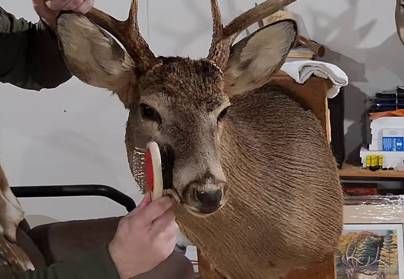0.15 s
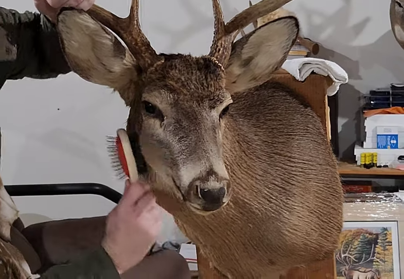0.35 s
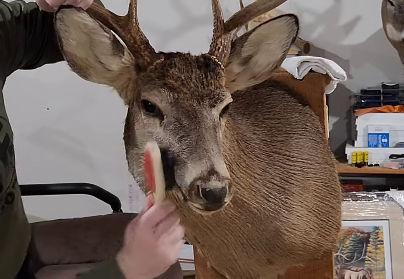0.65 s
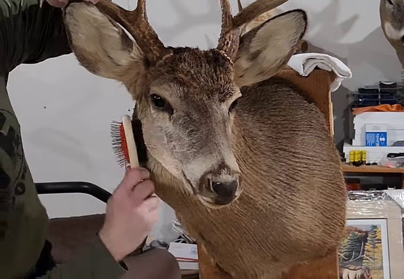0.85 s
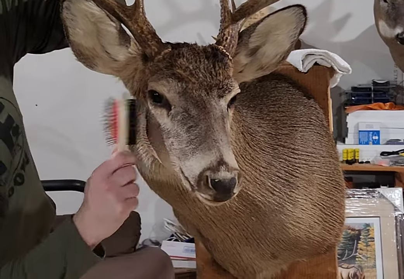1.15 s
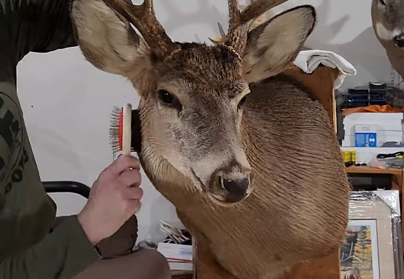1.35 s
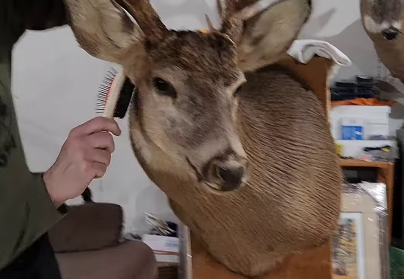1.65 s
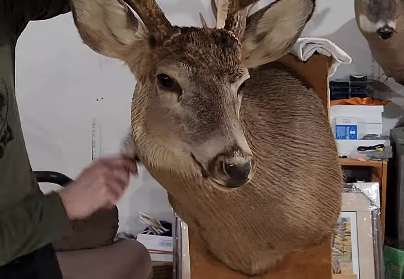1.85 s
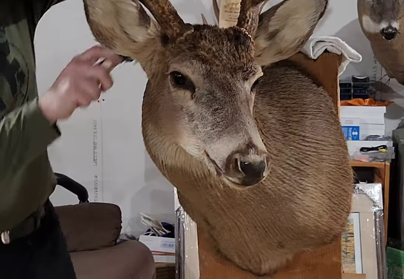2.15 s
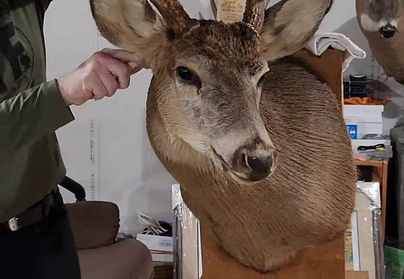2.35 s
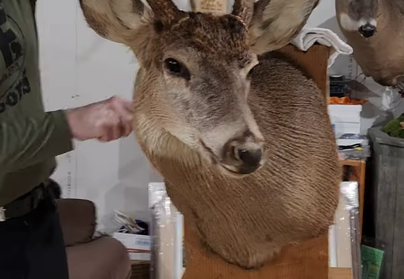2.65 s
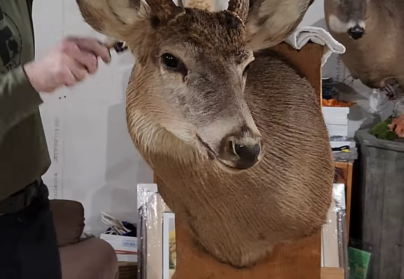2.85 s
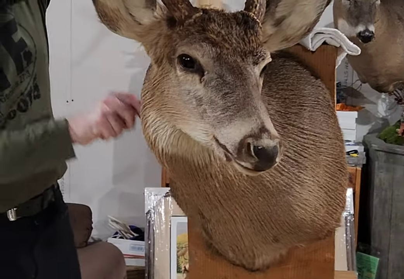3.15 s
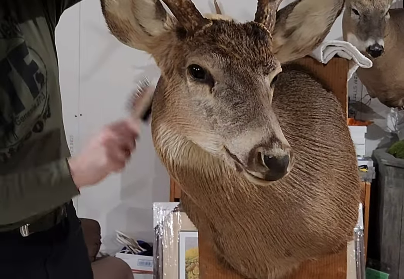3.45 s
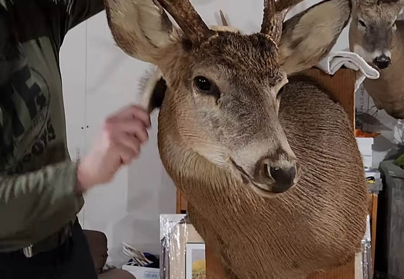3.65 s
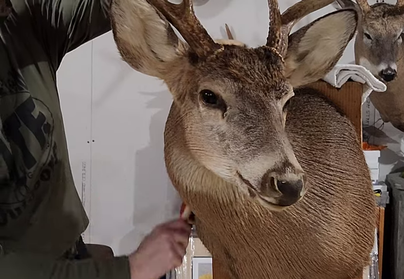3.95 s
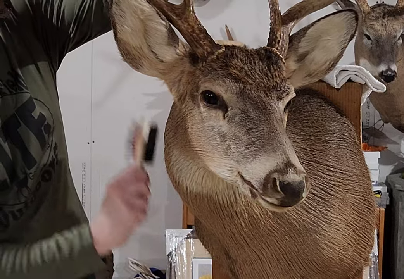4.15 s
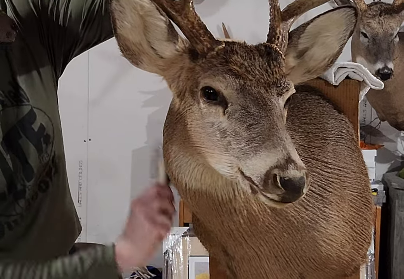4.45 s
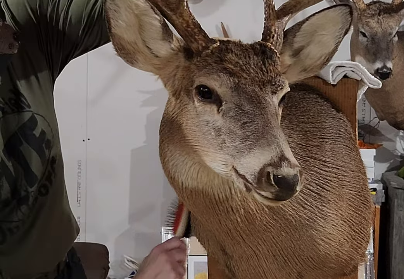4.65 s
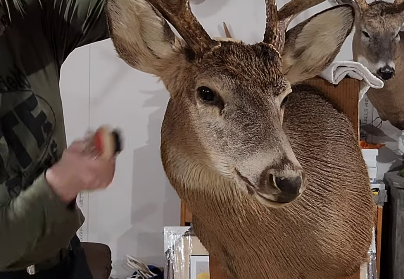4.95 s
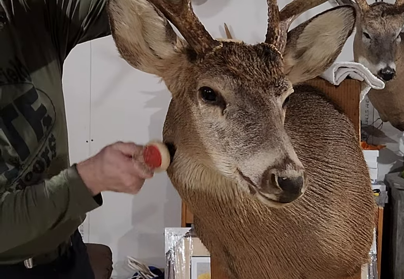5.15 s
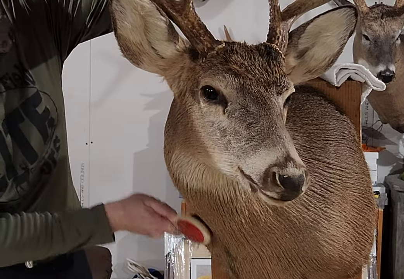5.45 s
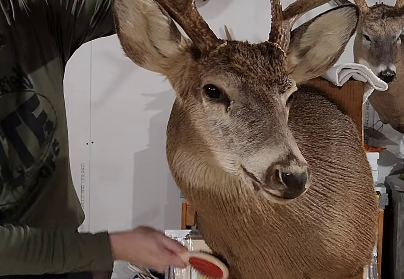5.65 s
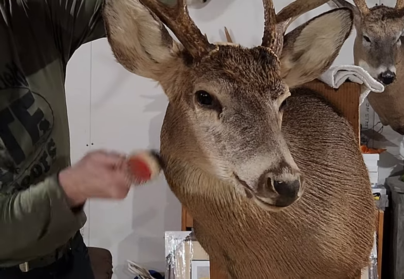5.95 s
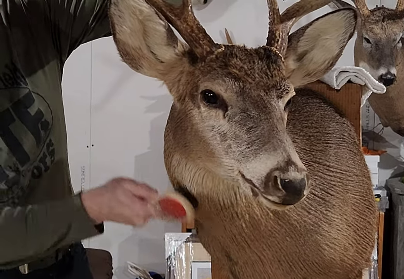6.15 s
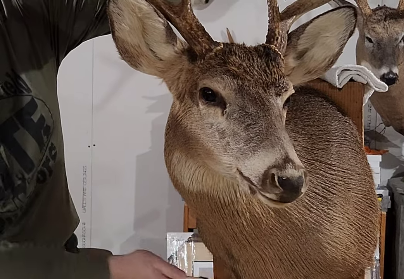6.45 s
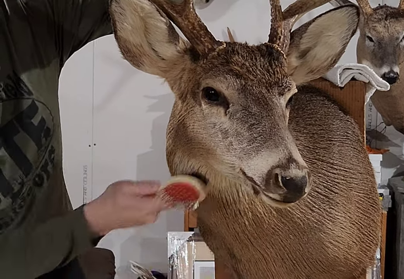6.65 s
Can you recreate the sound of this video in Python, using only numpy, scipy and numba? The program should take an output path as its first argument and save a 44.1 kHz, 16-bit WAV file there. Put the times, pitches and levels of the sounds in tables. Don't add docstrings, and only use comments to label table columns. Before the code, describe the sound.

A stiff brush works through coarse hair on a hollow mounted deer head, close to a phone in a small workshop. The tail of one stroke opens, then a short bright scratch at 0.2 s. At 0.7 s the brush lands with a crisp tap and a longer rasp; a dull thump at 1.2 s leads into a firm stroke, and a brief one follows at 1.8 s. From 2.2 s strokes sound hollower, a long one peaking near 2.6 s. Another from 3.0 s ends in a loud, sharp wooden clack at 3.3 s with a short ring. After a pause, sweeps come at 3.7 and 4.4 s, a long one landing with a dull thump at 5.1 s, a short one at 5.6 s, a hissier long one at 6.05 s, and a last brief touch near 6.8 s. A faint, rapidly beating low motor hum and soft airy rumble continue throughout.

```python
import sys
import numpy as np
from scipy import signal
from scipy.fft import rfft, irfft, next_fast_len
from scipy.io import wavfile
from scipy.ndimage import uniform_filter1d
from numba import njit

SR = 44100
rng = np.random.default_rng(int(sys.argv[2]) if len(sys.argv) > 2 else 0)


def to_linear_factor(level_db):
    exponent = np.asarray(level_db, float) / 20
    return 10 ** exponent


def waveform_to_disk(signal):
    frames = np.transpose(np.atleast_2d(signal))
    scaled = np.clip(frames, -1, 1) * 32767
    samples = np.round(scaled).astype(np.int16)
    wavfile.write(sys.argv[1], SR, samples)


N = 299439
T = np.arange(N) / SR
SIZE = next_fast_len(N)
HZ = np.maximum(np.arange(SIZE // 2 + 1) * SR / SIZE, 1)


def level(x, db):
    return x * to_linear_factor(db) / np.sqrt(np.mean(x ** 2))


def along(points, hz=HZ):
    f, v = np.transpose(points)[:2]
    return np.interp(np.log(hz), np.log(f), v)


def shape(x, gain):
    return irfft(rfft(x, SIZE) * gain, SIZE)[..., :x.shape[-1]]


def above(hz, order=4):
    return 1 / (1 + np.minimum(hz / HZ, 10 ** (100 / order)) ** (2 * order))


def band_noise(order, low_hz, high_hz, count):
    return signal.lfilter(*signal.butter(order, [low_hz, high_hz], "band", fs=SR), rng.standard_normal(count))


def walk(rate):
    hold = int(SR / rate)
    steps = np.repeat(rng.standard_normal(N // hold + 1), hold)
    return 1.68 * uniform_filter1d(uniform_filter1d(steps, hold), hold)[:N]


def ring(modes, rise_s, flip=-1):
    t = T[:SR]
    free = 0
    for k, (hz, db, t60) in enumerate(modes):
        free = free + flip ** k * to_linear_factor(db - 60 * t / t60) * np.sin(2 * np.pi * hz * t)
    return free * (1 - np.exp(-(t / rise_s) ** 2))


def add(out, s, x):
    i = int(s * SR)
    out[i:i + len(x)] += x[:len(out) - i]


@njit
def svf(x, hz, k):
    y, band, low = np.empty(len(x)), 0., 0.
    for i in range(len(x)):
        g = np.tan(np.pi * hz[i] / SR)
        v = (band + g * (x[i] - low)) / (1 + g * (g + k))
        band, low, y[i] = 2 * v - band, low + 2 * g * v, k * v
    return y


# frequency in Hz, level in dB per Hz.
BRISTLE_COLOUR = [(180, -39), (300, -3), (440, -22), (814, -2), (1060, -5), (1390, -5.5), (2170, -2),
                  (2570, -6), (4590, -10), (5800, -19), (7690, -18), (10600, -24.5), (11700, -19.5),
                  (14700, -19.5), (16000, -28)]


def brush():
    db, neck_db, form_db, hiss_db, form_hz = hand()
    db = db - 40 * np.interp(T, [3.32, 3.38, 3.6, 3.64], [0, 1, 1, 0])
    colour = to_linear_factor(along(BRISTLE_COLOUR))
    clicks = flicks(14000, 1.5) * to_linear_factor(1.3 * walk(70) + 1.3 * walk(25))
    drag = flicks(9000, 1.2) * to_linear_factor(1.5 * walk(35))
    scratch = shape(clicks, colour * np.sqrt(above(2880) * (1 - above(6200))))
    tuft_hz = np.clip(3700 * (1 + 0.38 * walk(8.2)), 2000, 7000)
    scratch = scratch + 0.58 * svf(scratch, tuft_hz, 0.071)
    hiss = shape(clicks, colour * np.sqrt(above(6200)))
    neck = shape(drag, colour * np.sqrt(above(380) * (1 - above(610))))
    form = shape(drag, colour * np.sqrt(above(900) * (1 - above(2500))))
    cavity_hz = np.clip(form_hz * (1 + 0.041 * walk(27)), 300, 4000)
    form = form + 1.1 * svf(form, cavity_hz, 0.35)
    body = to_linear_factor(neck_db) * level(neck, 0) + to_linear_factor(form_db) * level(form, 0)
    return to_linear_factor(db) * (level(scratch, 0) + body + to_linear_factor(hiss_db) * level(hiss, 0))


def flicks(rate, spread_db):
    moment, size = rng.random((N, 2)).T
    return (moment < rate / SR) * to_linear_factor(-spread_db * np.log(1 - size)) * rng.standard_normal(N)


# start in seconds, length in seconds, hardest point as share of the length,
# scratch level there in dB, fine hiss in dB above the scratch.
CHEEK_STROKES = [
    (0.236, 0.21, 0.47, -50, 1),
    (0.689, 0.31, 0.56, -48, -1),
    (1.274, 0.18, 0.74, -46, -3.5),
    (1.767, 0.098, 0.43, -49, -1),
    (6.757, 0.036, .2, -50.5, -3.5),
]
# start in seconds, length in seconds, hardest point as
# share of the length, scratch level there in dB, fine hiss in dB above the scratch.
NECK_STROKES = [
    (-.1, 0.14, 0.59, -53.5, -5),
    (.09, .12, 0.24, -60.5, -5.5),
    (2.0, .18, .9, -66.5, -3),
    (2.18, .18, .5, -57.5, -7.5),
    (2.359, .34, 0.73, -52, -4.5),
    (3.022, 0.24, 0.94, -51.5, -5),
    (3.72, 0.27, 0.22, -53.5, -3),
    (4.375, 0.28, 0.25, -53, -2.5),
    (4.72, .08, .3, -75.5, 2),
]
# start in seconds, length in seconds, hardest point as share of the
# length, scratch level there in dB, fine hiss in dB above the scratch.
CHEST_STROKES = [
    (3.301, .016, .9, -44.5, -12),
    (5.105, .42, 0.19, -52.5, -4.5),
    (5.573, .115, 0.48, -53.5, -2),
    (6.045, .37, .25, -52.5, -0.5),
]
# form at landing and at lift-off in dB, neck at landing
# and at lift-off in dB, ring at landing and at lift-off in Hz; levels relative to the scratch.
PLACE_RING = [(-0.5, -4, -15.5, -13.5, 1700, 1350), (-1, 4, -15, -6.5, 1650, 1330),
              (-2, 3, -12, -5.5, 1450, 1200)]
PLACE_PRESSURE = [(35, 21), (45, 22), (90, 12)]
# form in dB, neck in dB, hiss in dB, ring in Hz.
HOVER_TONE = (-2, 4, -4, 1302)
# start in seconds, end in seconds, level in dB.
MOUNT_ROCKS = [
    (0.127, 0.18, -61),
    (0.853, 0.89, -58.5),
    (1.323, 1.375, -55),
    (5.72, 5.875, -61),
]
# start in seconds, end in seconds, level in dB.
BRISTLE_DIGS = [
    (.89, 0.917, -48),
    (2.192, 2.27, -51),
    (2.6, 2.673, -57),
    (5.4, 5.505, -48),
    (6.36, 6.364, -45.5),
]


def hand():
    step = 64
    t = T[::step]
    form_db, neck_db, hiss_db, ring_hz = HOVER_TONE
    hover_db = -72.5 - 2 * t
    best = np.array([hover_db] + [np.full(len(t), 1. * v) for v in (neck_db, form_db, hiss_db, ring_hz)])
    places = zip((CHEEK_STROKES, NECK_STROKES, CHEST_STROKES), PLACE_RING, PLACE_PRESSURE)
    soft_db_s, tap_db_s, lift_db_s = 329, 3000, 397
    for strokes, (form0, form1, neck0, neck1, hz0, hz1), (press, ease) in places:
        for s, length, hardest, db, hiss_db in strokes:
            u = np.clip((t - s) / length, 0, 1)
            after = np.maximum(t - s - length, 0)
            lean = length * (press * np.maximum(hardest - u, 0) + ease * np.maximum(u - hardest, 0))
            tapped = min(abs(s - tap[0]) for tap in LANDINGS) < .01
            landing = (tap_db_s if tapped else soft_db_s) * np.maximum(s - t, 0)
            lifting = np.minimum(lift_db_s * after, 22.5 + 40 * after)
            arch = 1.5 * (2 * (u - .5)) ** 2
            stroke = [db - lean - (landing + lifting), neck0 + (neck1 - neck0) * u,
                      form0 + (form1 - form0) * u ** 0.95, hiss_db - arch, hz0 + (hz1 - hz0) * u]
            best = np.where(stroke[0] > best[0], stroke, best)
    for layer, rows, db_s in ((1, MOUNT_ROCKS, soft_db_s), (2, BRISTLE_DIGS, 158)):
        for start, end, db in rows:
            outside = np.maximum(np.maximum(start - t, t - end), 0)
            best[layer] = np.maximum(best[layer], db - best[0] - db_s * outside)
    slack = max(int(.012 * SR / step), 1)
    return [np.interp(T, t, c) for c in uniform_filter1d(best, slack)]


# time in seconds, tick in dB, tick pitch in Hz, thump in dB, thump delay in
# seconds.
LANDINGS = [
    (.692, -23, 3000, -39, 0.02),
    (1.2125, -39.5, 2660, -32.5, 0.00026),
    (2.18, -43, 2640, -50, 0.0013),
    (5.106, -45, 1660, -34.5, 0.00082),
    (6.046, -50, 1510, -44.5, 0.0043),
]
# frequency in Hz, level in dB, 60 dB decay in seconds.
FORM_THUMP = [(167.7, -1.5, 0.25), (190, 7, 0.082), (245, 10.5, 0.12), (290, -24, 0.085), (400, -5, 0.032)]


def taps():
    out = np.zeros(N)
    for s, tick_db, hz, thump_db, late in LANDINGS:
        tick = [(hz, 0, .012), (.7 * hz, -6, .016), (1.22 * hz, -7, .008), (2.25 * hz, -15, .01)]
        add(out, s, to_linear_factor(tick_db) * ring(tick, .0004))
        add(out, s, to_linear_factor(tick_db + 0.5) * snap(hz))
        add(out, s + late, to_linear_factor(thump_db - 5.5) * ring(FORM_THUMP, 0.0018, flip=0.79))
        pat = band_noise(1, 500, 1700, 4000)
        add(out, s, to_linear_factor(thump_db - 3 - 60 * T[:4000] / 0.057) * pat)
    return shape(out, above(85, order=2))


def snap(hz):
    return band_noise(1, hz / 3, 1.5 * hz, 600) * to_linear_factor(-60 * T[:600] / .012)


# frequency in Hz, level in dB, 60 dB decay in seconds.
WOOD_MODES = [(427, -23, 0.021), (683, -22.5, 0.025), (900, -3.5, 0.015), (1312, -3, 0.016),
              (1600, -17, 0.042), (1882, -14.5, 0.036), (2196, -14, 0.0084), (2775, -18, 0.015),
              (4700, -39, .008)]
# frequency in Hz, level in dB per Hz.
CRACK_COLOUR = [(150, -40.5), (300, -27), (500, -10.5), (800, 5.5), (1400, -6), (2000, -20), (3000, -12.5),
                (5000, -27.5), (8000, -39), (12000, -38.5)]
CLACK_S, CLACK_DB = 3.3166, 3


def clack():
    out, blow = np.zeros(N), np.zeros(N)
    blow[int((CLACK_S + .0009) * SR)] = 1
    add(out, CLACK_S, to_linear_factor(CLACK_DB) * ring(WOOD_MODES, 0.00056))
    mount = [(168, -38.5, 0.16), (195, -43, 0.19), (272, -35, 0.16), (349, -34.0, .12)]
    add(out, CLACK_S, ring(mount, 0.018))
    t = T[:SR // 4]
    shiver = band_noise(2, 2300, 6200, SR // 4)
    swell = np.clip(t / 0.0046, 0, 1) * to_linear_factor(-60 * t / 0.054)
    add(out, CLACK_S + 0.0083, to_linear_factor(-21.5) * shiver * swell)
    return out + to_linear_factor(CLACK_DB + 19.5) * shape(blow, to_linear_factor(along(CRACK_COLOUR)))


def singing():
    out = np.zeros(N)
    add(out, CLACK_S, ring([(657, -49, 1.6), (888, -41, .36)], .015))
    return out


# frequency in Hz, left minus right in dB.
PORT_TILT = [(60, -2.5), (110, -1.5), (200, -0.5), (380, 0.5), (700, -0.5), (1290, -2.0), (2380, -1.0),
             (4400, -2.5), (8120, 3.5), (15000, 2.5)]
# frequency in Hz, lead of the left port in radians for a source on the left.
PORT_LEAD = [(0, 0), (1460, 0.7), (2240, -0.0), (4820, 2.2), (6980, 2.7), (8270, 2.1), (8530, 3.1),
             (10800, 3.1), (11400, 4.4), (12700, 3.9), (14000, 5.1), (14600, 4.5), (15200, 5.5),
             (16200, 3.2)]


def ports(x, off_axis):
    lead = off_axis * np.interp(HZ, *np.transpose(PORT_LEAD))
    tilt = to_linear_factor(along(PORT_TILT) / 2) * np.exp(.5j * lead)
    return shape(x, np.array([tilt, 1 / tilt]))


# delay in seconds, left level in dB, right level in dB.
WALL_ECHOES = [
    (.0052, -1, 0),
    (.012, -8, -9),
    (.016, -7, -7),
    (.0225, -6, -7),
]
# band centre in Hz, 60 dB decay in seconds, level in dB.
ROOM_TAIL = [(127.1, 0.17, -16.5), (223, 0.4, -14), (490, 0.29, 10), (990, 0.17, 3), (2000, 0.38, -7),
             (3820, 0.27, 2), (7940, 0.028, -2.5), (13800, 0.14, 5.5)]


def room():
    t = T[:SR // 2]
    noise, tail, low = rng.standard_normal((2, len(t))), 0, 1
    alike = np.clip(.9 - .7 * above(600, order=1), 0, .98)
    noise[1] = shape(noise[0], alike) + shape(noise[1], np.sqrt(1 - alike ** 2))
    for hz, t60, db in ROOM_TAIL:
        high = above(hz * np.sqrt(2), order=2)
        tail = tail + shape(noise, low - high) * to_linear_factor(db - 60 * t / t60)
        low = high
    tail = tail * np.clip((t - .004) / 0.0073, 0, 1)
    tail = to_linear_factor(0.5) * tail / np.sqrt(np.sum(tail ** 2) / 2)
    echoes = np.zeros_like(tail)
    for s, left_db, right_db in WALL_ECHOES:
        echoes[:, int(s * SR)] = to_linear_factor(np.array([left_db, right_db]))
    return tail + shape(echoes, 1 - above(3200, order=1))


# time in seconds, level in dB.
MOTOR_TURN = [(0, -1), (1, -1.5), (3, -4), (4.2, -4.5), (5.7, -5), (6.2, -2.5), (6.79, -4.5)]
# level in dB, share of the turn 0-1.
MOTOR_LINES = [(-51, 1), (-58, .1), (-66.5, .8)]


def hum():
    turn_db = np.interp(T, *np.transpose(MOTOR_TURN))
    low_db, high_db, third_db = (db + share * turn_db for db, share in MOTOR_LINES)
    side = np.array([[1], [-1]])
    phase = 2 * np.pi * np.cumsum(1 + .0008 * walk(1.2)) / SR
    beat = 2 * np.pi * 13.21 * (T - .036)
    low = to_linear_factor(low_db - .7 * side + .4 * walk(11)) * np.sin(230.95 * phase + 0.21 * side)
    high = to_linear_factor(high_db + 1.1 * side + .6 * walk(2.1)) * np.sin(230.95 * phase + beat + 0.54 * side)
    third = to_linear_factor(third_db + 1.2 * walk(1.6)) * np.sin(356.4 * phase + .6 * side)
    return np.sqrt(2) * (low + high + third)


# frequency in Hz, level in dB per Hz.
AIR_COLOUR = [(20, -15), (67, -0.7), (130, -8.5), (300, -13), (700, -17.5), (1100, -22), (2100, -22.5),
              (2800, -33), (5000, -36), (8000, -49.5), (10500, -55), (13500, -50), (15500, -47)]
# frequency in Hz, left-right likeness 0-1.
AIR_LIKENESS = [(60, .85), (250, 0.7), (640, 0), (15000, 0)]


def air():
    mid, side = rng.standard_normal((2, N))
    alike = np.clip(along(AIR_LIKENESS), -.9, .99)
    mid, side = shape(mid, np.sqrt(1 + alike)), shape(side, np.sqrt(1 - alike))
    tilt = to_linear_factor(along(PORT_TILT) * np.array([[.5], [-.5]]))[:, :1]
    pair = np.array([mid + side, mid - side]) * tilt
    colour, out, low = to_linear_factor(along(AIR_COLOUR)), 0, 1
    for hz in 45 * 2. ** np.arange(10):
        high = above(hz, order=2)
        out = out + to_linear_factor(1.6 * walk(3.84)) * shape(pair, colour * (low - high))
        low = high
    whistle = shape(rng.standard_normal((2, N)), np.exp(-((HZ - 6470) / 35) ** 2))
    return level(out, -56.5) + level(whistle, -91.5)


def scene():
    middle, touch, hit = brush(), taps(), shape(clack(), above(100, order=2))
    apart = np.clip(0.72 * above(1100, order=1), 0, .9)
    outer = np.array([brush(), brush()])
    sent = to_linear_factor(-11.5) * (middle + touch) + to_linear_factor(-1.5) * hit
    wet = signal.fftconvolve(sent[None], room(), axes=1)[:, :N]
    direct = shape(middle, np.sqrt(1 - apart)) + shape(outer, np.sqrt(apart)) + touch
    return ports(direct, 0.88) + ports(hit + singing(), .15) + wet + hum() + air()


def top_cut(x):
    return signal.sosfilt(signal.butter(12, 16640, fs=SR, output="sos"), x)


def record(dry):
    rounded = np.tanh(.8 * dry) / .8
    mix = shape(rounded, 1 - above(15600, order=150))
    return top_cut(mix)


dry = scene()
out = record(dry)
waveform_to_disk(out)
```